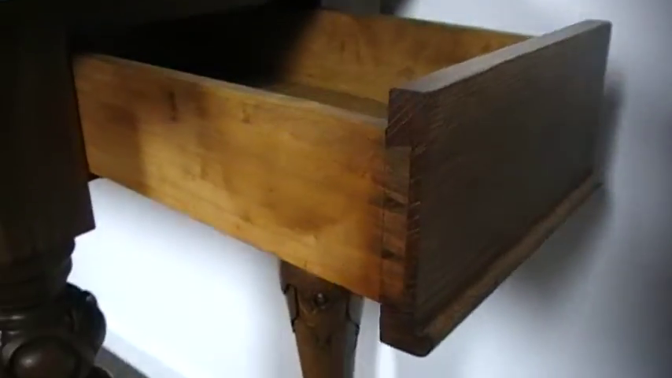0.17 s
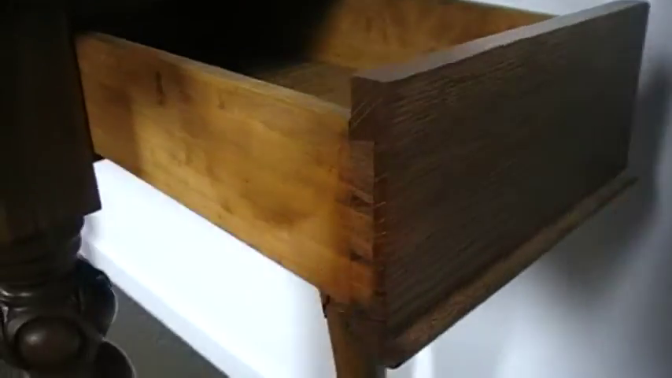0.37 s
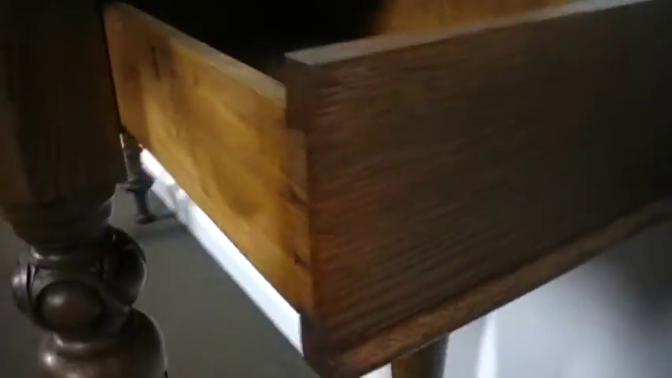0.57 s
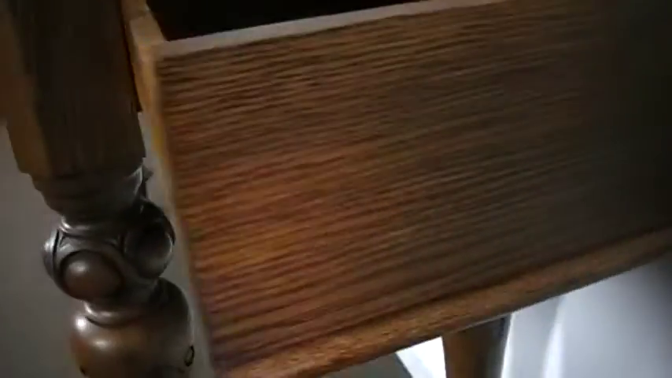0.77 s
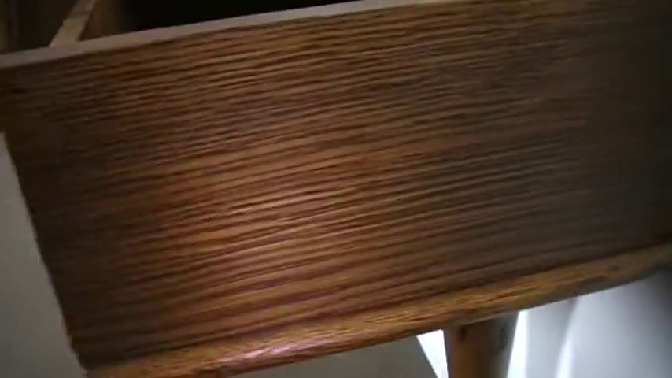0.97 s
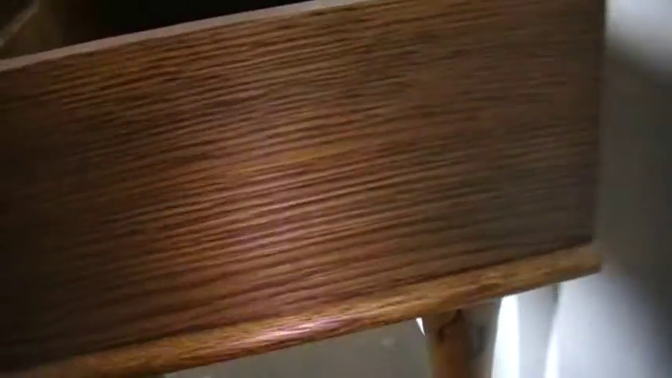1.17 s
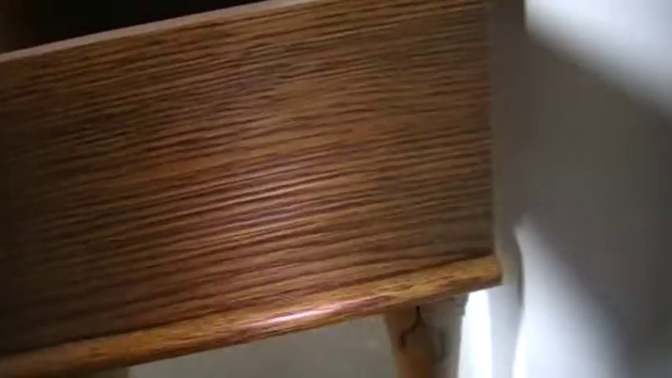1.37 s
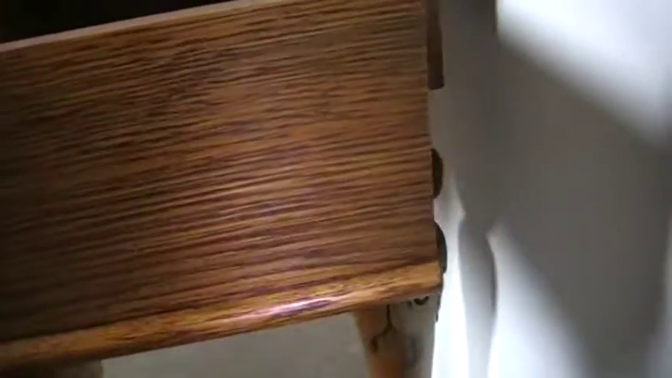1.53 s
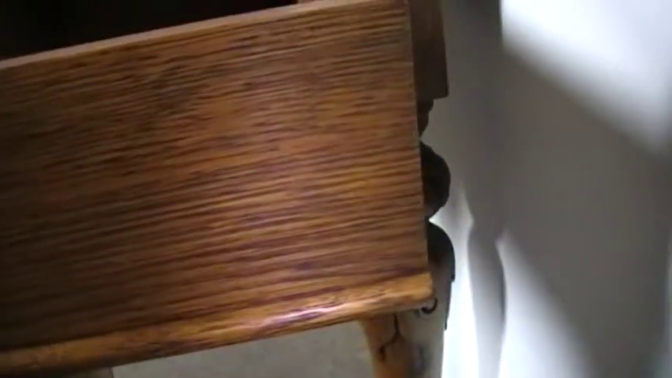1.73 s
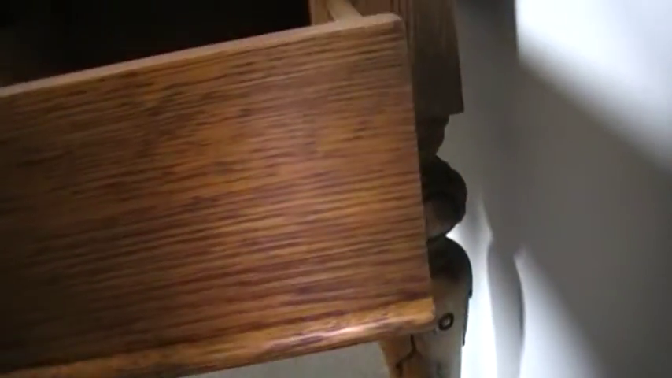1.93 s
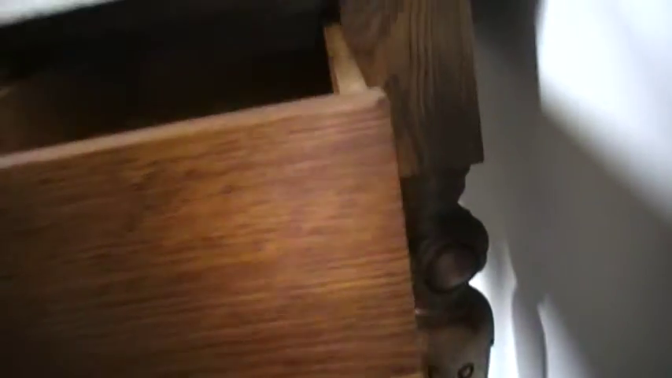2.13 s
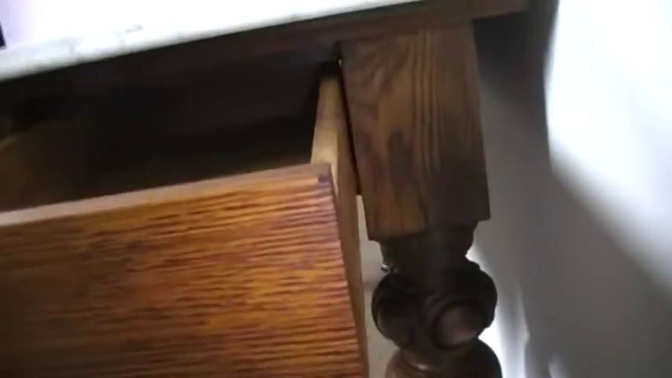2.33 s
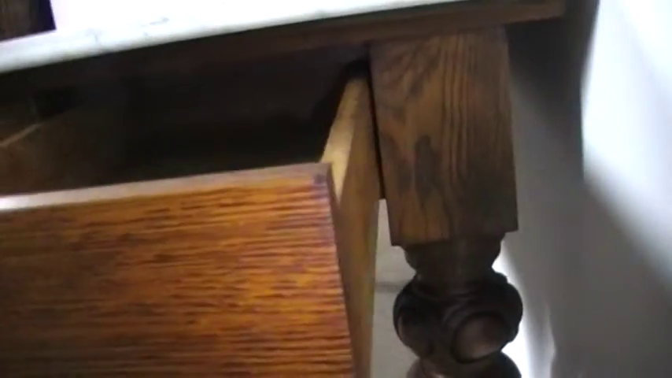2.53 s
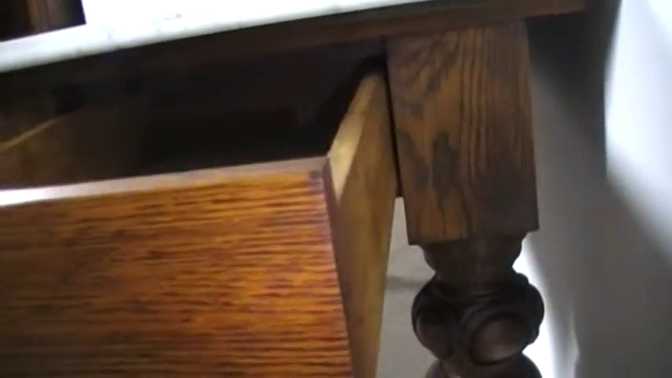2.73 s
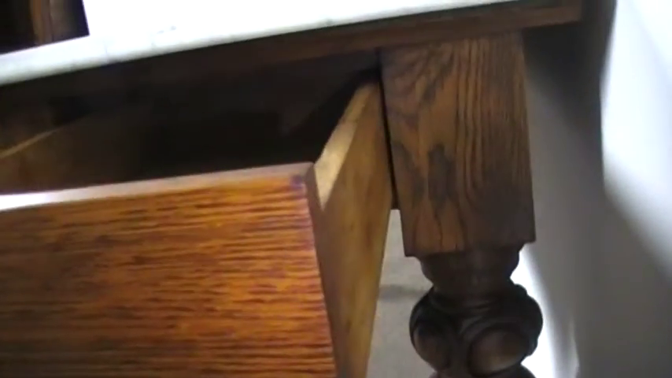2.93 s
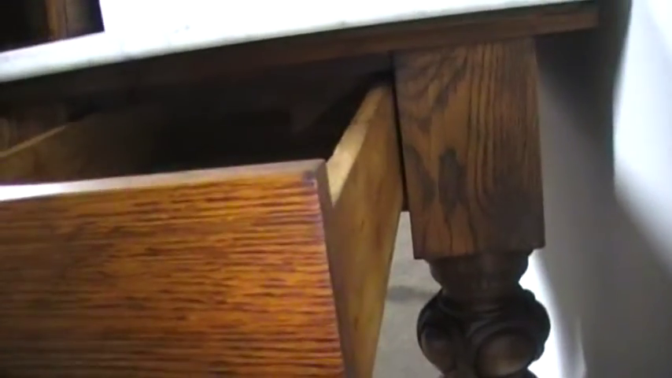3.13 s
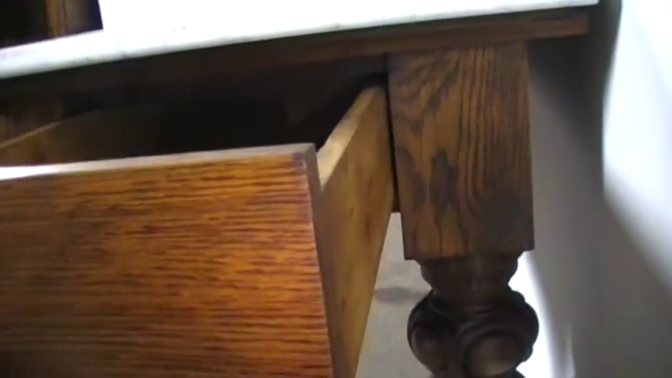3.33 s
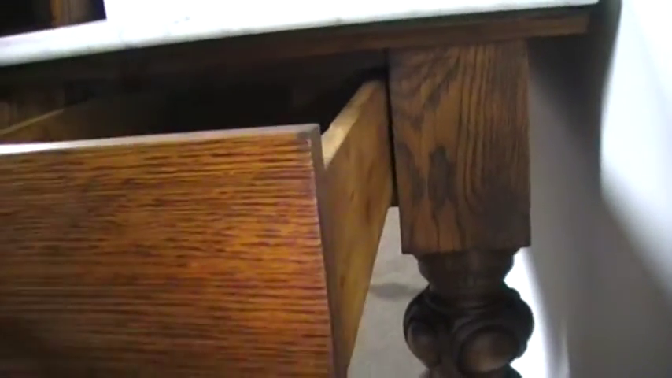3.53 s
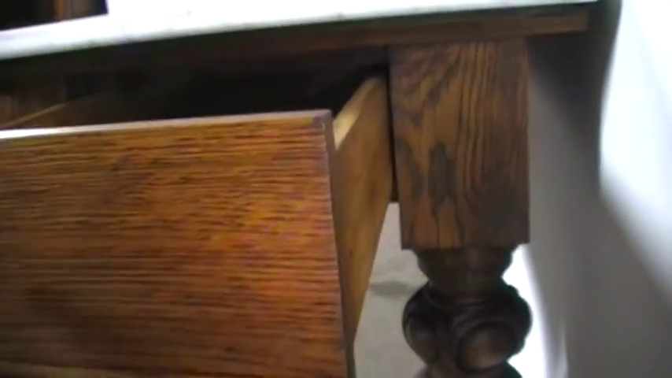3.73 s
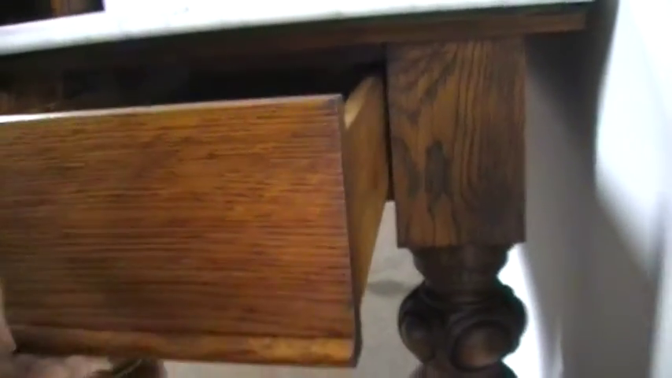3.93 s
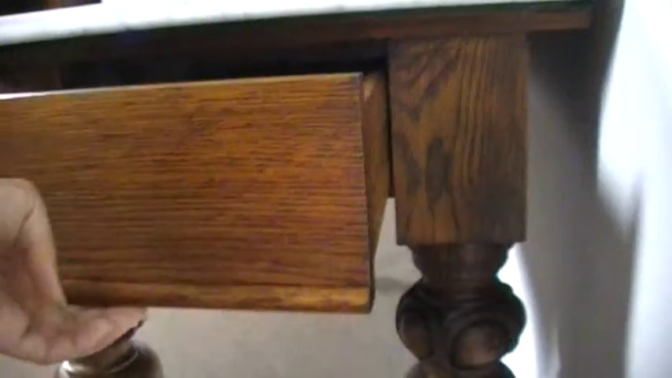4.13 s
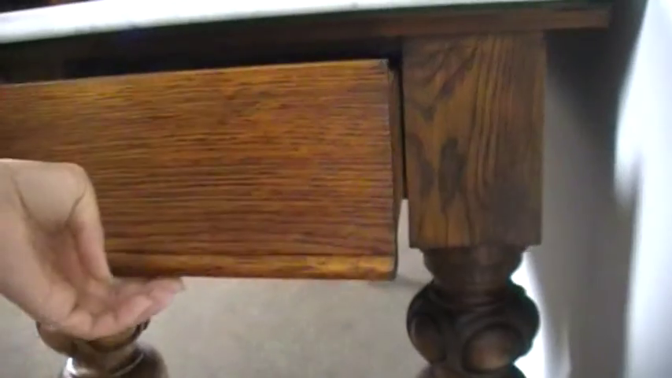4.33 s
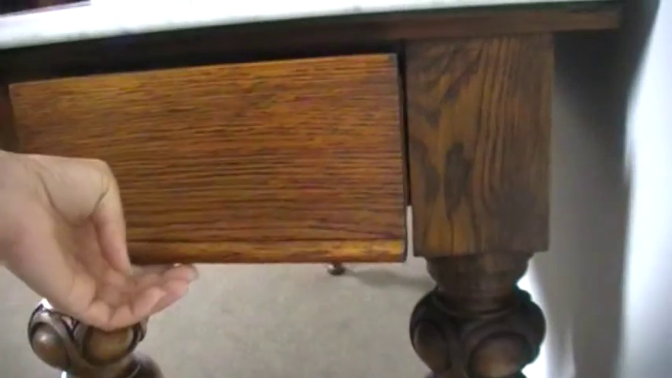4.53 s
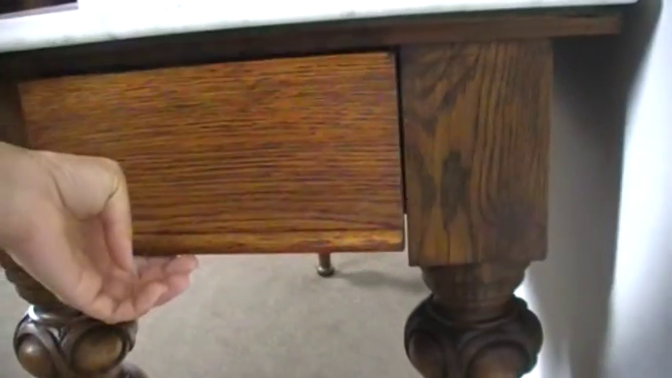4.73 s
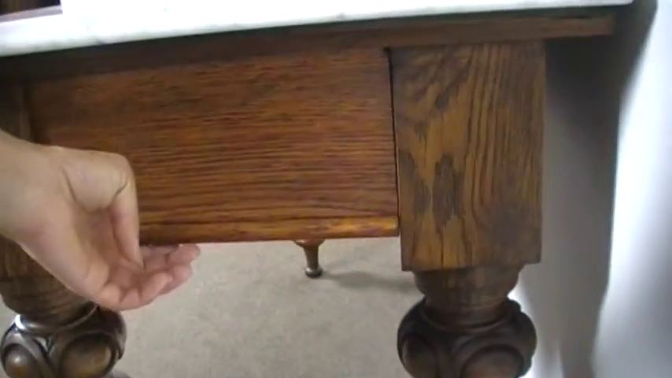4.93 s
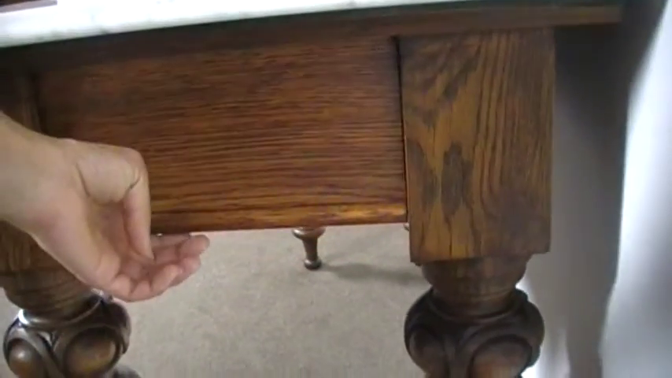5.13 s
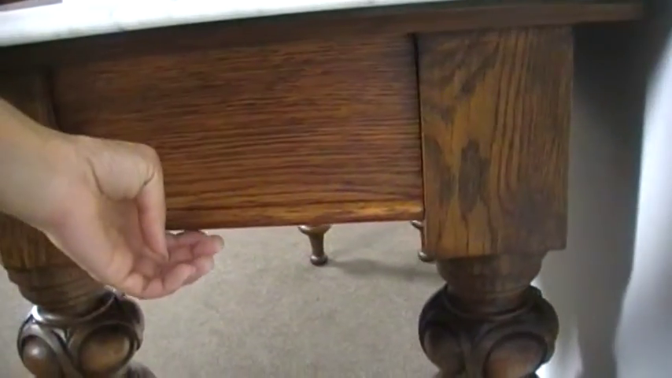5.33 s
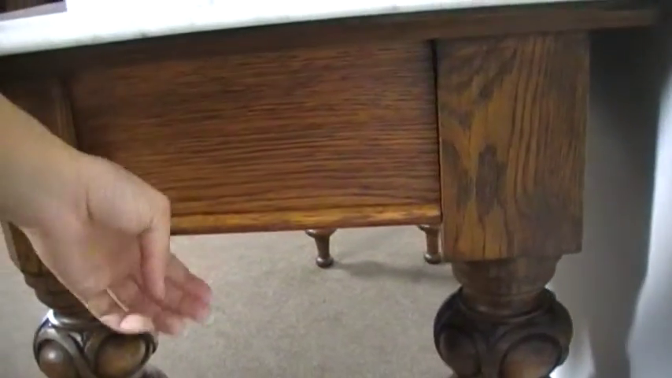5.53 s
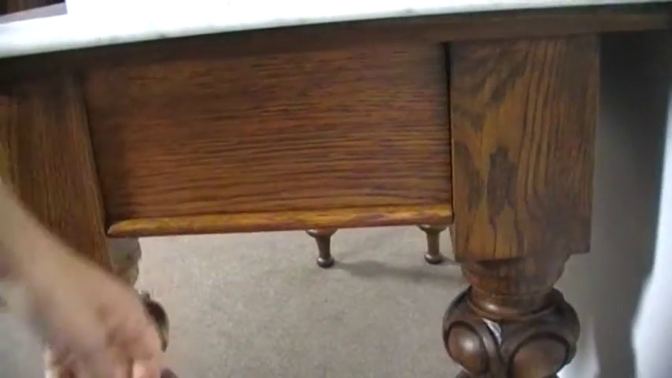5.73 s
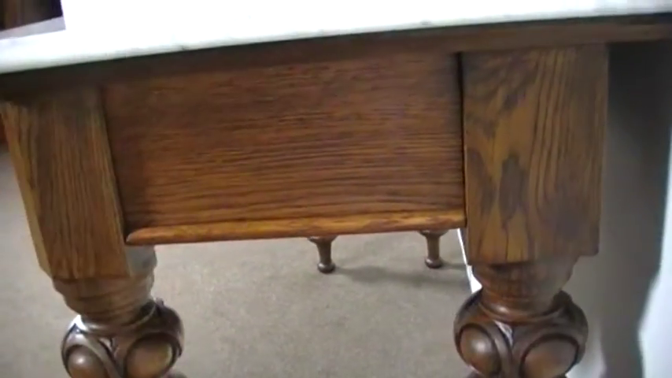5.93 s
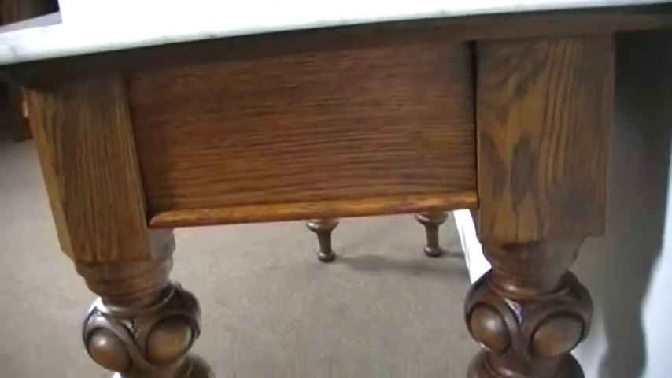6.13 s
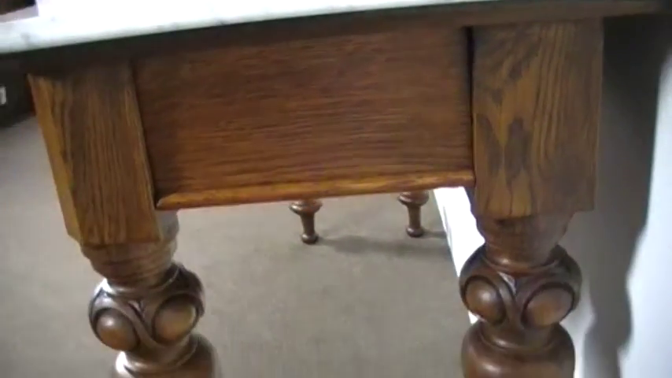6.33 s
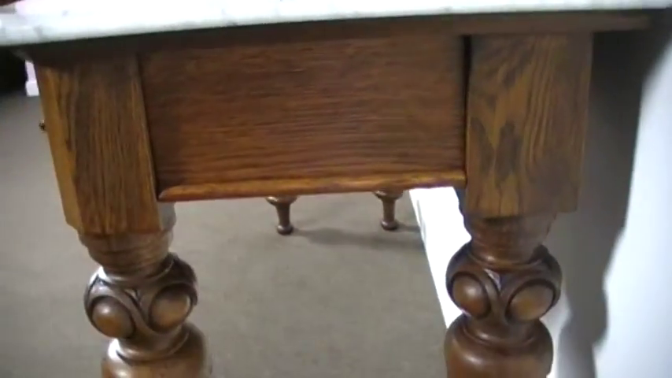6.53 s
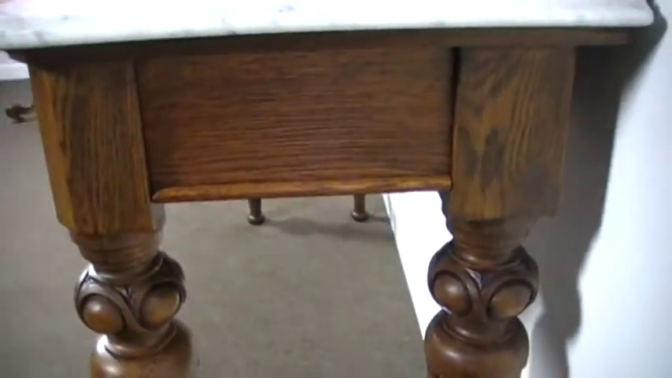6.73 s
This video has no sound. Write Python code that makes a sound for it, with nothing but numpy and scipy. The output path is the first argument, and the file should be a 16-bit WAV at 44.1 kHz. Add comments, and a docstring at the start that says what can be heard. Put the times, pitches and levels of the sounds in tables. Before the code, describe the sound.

Quiet indoor ventilation hum with faint motor tones. Clothing rustles and fingers tick against a hand-held stereo microphone. A loose oak drawer tips with a cluster of hollow wooden clunks, pauses, then is pushed in with a dry, hissing, drumming wood scrape. It stops with a sharp, loud crack, a very brief rattle and a moderate room tail; a last soft cloth scuff follows.

```python
"""A quiet showroom hums while clothes rustle and fingers tap on a hand-held microphone with two ports.
An old oak drawer, pulled far out of a table, then tips on its runners with wooden clunks.
Pushed home, it scrapes wood on wood, hits its stop with a sharp knock and rattles briefly.
Air noise and motor tones make the hum, and shaped noise bursts the small contacts; random catches drive
resonances for the scrape, and decaying wood modes sound in the blows, with a diffuse tail for the room."""
import sys
import numpy as np
from scipy import signal
from scipy.fft import rfft, irfft, next_fast_len
from scipy.io import wavfile
from scipy.ndimage import map_coordinates

SR = 44100
rng = np.random.default_rng(int(sys.argv[2]) if len(sys.argv) > 2 else 0)


def int16_out(signal):
    """Quantize to a 16-bit WAV file."""
    q = np.round(np.clip(np.atleast_2d(signal).T, -1, 1) * 32767)
    wavfile.write(sys.argv[1], SR, q.astype(np.int16))


N = 299429  # length in samples
T = np.arange(N) / SR  # time in seconds

CRACK_S = 4.9704  # moment of the final knock
# The push, from first movement to the stop. Each row: time in seconds, level of the friction in dB.
PUSH_FRICTION = [(3.165, -68), (3.22, -56.5), (3.294, -49), (3.344, -54), (3.584, -42.5), (3.708, -45),
                 (3.744, -39), (3.928, -36.5), (4.054, -38.5), (4.244, -37.5), (4.274, -40.5),
                 (4.298, -38.5), (4.558, -44), (4.945, -43.5)]
# Bright spectrum of wooden friction and splintering. Each row: frequency in Hz, gain in dB.
HISS_SPECTRUM = [(1500, -18), (3600, 0.5), (4600, -1.5), (5400, 0), (6500, -0.5), (7400, -0.5), (8900, -1),
                 (9400, -6), (10100, -5), (11200, -11), (11800, -13), (14000, -25.5), (15500, -53)]


def amp(db):
    """The decibel law: level in dB to amplitude gain."""
    return 10 ** (np.asarray(db) / 20)


def unit(x):
    """Normalization of power: scales to rms 1."""
    return x / np.sqrt(np.mean(x ** 2) + 1e-20)


def unit_energy(x):
    """Normalization of energy: scales a transient so that the squares average to a sum of 1 a channel."""
    return unit(x) / np.sqrt(x.shape[-1])


def read(points, hz):
    """Interpolation of a spectrum on a logarithmic frequency axis, as pitch is heard."""
    f, value = np.transpose(points)
    return np.interp(np.log(hz + 1), np.log(f + 1), value)


def add(mix, s, sound):
    """Superposition: adds a sound to the mix at time s in seconds."""
    part = mix[:, max(round(s * SR), 0):][:, :sound.shape[-1]]
    part += sound[..., :part.shape[1]]


def colour(x, points):
    """Linear filtering: multiplies the spectrum by a gain curve in dB."""
    size = next_fast_len(x.shape[-1] + 2048)
    gain = amp(read(points, np.fft.rfftfreq(size, 1 / SR)))
    return irfft(rfft(x, size) * gain, size)[..., :x.shape[-1]]


def pair(x, same):
    """Coherence: mixes two unrelated channels into a pair with the correlation same."""
    same = np.clip(same, 0, 1)
    mid = np.sqrt((1 + same) / 2) * x[0]
    side = np.sqrt((1 - same) / 2) * x[1]
    return np.array([mid + side, mid - side])


def diffuse(size, likeness):
    """Diffuse field: noise whose correlation between the two ports depends on frequency."""
    spectra = rfft(rng.standard_normal((2, size)))
    return irfft(pair(spectra, read(likeness, np.fft.rfftfreq(size, 1 / SR))), size)


def dying(noise, bands):
    """Frequency-dependent damping: splits noise into bands that each decay at their own speed."""
    size = noise.shape[-1]
    t, hz = np.arange(size) / SR, np.fft.rfftfreq(size, 1 / SR)
    spectrum = rfft(noise)
    centres, out = np.array(bands)[:, 0], 0
    for pick, (_, db, t60) in zip(np.eye(len(bands)), bands):
        weight = read(np.column_stack([centres, pick]), hz)
        band = irfft(spectrum * weight, size) * amp(-60 * t / t60)
        energy = t60 * np.sum(weight ** 2)  # long and wide bands carry more
        out = out + amp(db) * np.sqrt(energy) * unit_energy(band)
    return unit_energy(out)


def wander(per_s):
    """Random fluctuation: straight lines between normal random values, per_s of them a second."""
    return np.interp(T * per_s, np.arange(N), rng.standard_normal(N))


def asperities(per_s, spread_db, same):
    """Asperity contact: countless tiny catches of fibre on fibre, a few of them larger."""
    size = amp(spread_db * np.minimum(rng.exponential(1, (2, N)), 5))
    sign = rng.choice([-1, 1], (2, N))
    happens = rng.random((2, N)) < per_s / SR
    return pair(unit(size * sign * happens), same)


def resonate(x, hz, width):
    """Resonance: two equal poles, each width Hz wide, follow the frequency curve hz."""
    turn = np.exp(2j * np.pi * np.cumsum(hz * np.ones(N)) / SR)
    r = np.exp(-np.pi * width / SR)
    baseband = signal.lfilter([1], [1, -2 * r, r * r], x / turn)  # filtered around 0 Hz
    return unit((turn * baseband).real)


def stroke(peak_s, rise_s, fall_s, db):
    """Envelope of a rubbing movement: its gain changes by 20 dB in each of the rise and fall times."""
    away = np.maximum((peak_s - T) / rise_s, (T - peak_s) / fall_s)
    return amp(db - 20 * np.minimum(away, 10))


def ports(x, balance, lead):
    """Directional hearing: two microphone ports receive a source with different level and phase."""
    size = next_fast_len(N + 2048)
    hz, side = np.fft.rfftfreq(size, 1 / SR), np.array([[.5], [-.5]])
    transfer = amp(side * read(balance, hz)) * np.exp(1j * side * read(lead, hz))
    return irfft(rfft(x, size) * transfer, size)[:, :N]


def room_tail(build_s=0.0077):
    """Reverberation: the diffuse field builds up after a moment, then decays band by band."""
    # Decay of the room. Each row: frequency in Hz, level in dB, t60 in seconds.
    decay = [(100, -3.5, 0.54), (200, 3.5, 0.73), (438, 1, 0.66), (1000, 1, 0.71), (2000, 0.5, 0.89),
             (4030, 1, 0.62), (8000, -0.5, 0.51), (15160, -3.5, 0.076)]
    # Diffuse sound at the two ports. Each row: frequency in Hz, correlation from 0 to 1.
    likeness = [(60, 0.99), (300, 0.6), (700, 0.25), (1500, 0.5), (4000, 0.9), (12000, 0)]
    build_up = 1 - np.exp(-(np.arange(SR) / SR / build_s) ** 2)
    return dying(diffuse(SR, likeness), decay) * build_up


def showroom(x):
    """Convolution with a room response: returns the reverberation of a sound."""
    return signal.fftconvolve(x.mean(0)[None], room_tail(), axes=1)[:, :N]


def ventilation():
    """Broadband flow noise and tonal radiation: steady air with faint, slightly wavering motor tones."""
    # Air noise. Each row: frequency in Hz, gain in dB.
    air_spectrum = [(20, -31.5), (45, -27.5), (75, -12), (108, -6), (150, -6.5), (220, -4.5), (400, -5.5),
                    (750, -5.5), (1400, -9), (2500, -13.5), (4000, -16.5), (6300, -22.5), (10000, -24.5),
                    (15500, -36.5)]
    # Air at the two ports. Each row: frequency in Hz, left-right correlation from 0 to 1.
    likeness = [(60, 0.66), (150, 0.1), (220, 0), (15000, 0)]
    # Level difference of the ports. Each row: frequency in Hz, left minus right in dB.
    balance = [(60, -10), (110, -4.5), (200, -3.5), (380, -1.5), (700, -2.5), (1290, -1.5), (2380, -3),
               (4400, -1.5), (8120, -2), (15000, 0.0)]
    # Motor tones ahead of the port filter.
    # Each row: frequency in Hz, rms level in dB, extra lead of the left port in radians.
    tones = [(107.7, -83, .2), (726.7, -72, -.3), (1093, -79.5, -1.2), (2186.7, -72.5, -.5)]
    turns = np.cumsum(1 + 0.00048 * wander(per_s=7.6)) / SR  # all tones waver together
    hum = 0
    for hz, db, lead in tones:
        phase = 2 * np.pi * hz * turns + np.array([[lead], [0]])
        hum = hum + amp(db) * np.sqrt(2) * np.sin(phase)
    air = amp(-61.46) * unit(colour(diffuse(N, likeness), air_spectrum))
    return ports(air + hum, balance, lead=[(100, 0.55), (700, -1.51), (3000, -0.83)])


def rustle():
    """Granular friction: cloth and fingers brush near the microphone in clumps of small grains."""
    # Dull rub. Each row: frequency in Hz, gain in dB.
    rub_spectrum = [(300, -25), (700, 0), (1050, 2.5), (1250, -0.5), (1600, -1), (1900, -2), (2800, -12),
                    (5000, -27)]
    # Bright fizz. Each row: frequency in Hz, gain in dB.
    fizz_spectrum = [(1000, -1), (2800, 5.5), (5000, 2.5), (7000, 0), (9500, 0), (11500, -10.5),
                     (15500, -30)]
    # Each row: peak in seconds, rise in seconds, fall in seconds, level in dB, fizz against rub in dB.
    movements = [(.17, 0.88, 0.43, -59, 0), (0.193, 0.018, 0.013, -57.5, 4), (0.491, 0.017, 0.022, -64, 4),
                 (.52, 0.017, 0.036, -60.5, 0.5), (.62, 0.11, 0.24, -60.5, -3), (.91, 0.25, 1, -64, -2.5),
                 (6.52, 0.37, 0.26, -60.5, -0.5), (6.579, 0.04, 0.015, -69, 9)]
    rub = unit(colour(asperities(per_s=1200, spread_db=0.5, same=0.041), rub_spectrum))
    rub = rub * amp(2.4 * wander(per_s=29))
    fizz = unit(colour(asperities(per_s=3100, spread_db=0.5, same=0.36), fizz_spectrum))
    fizz = fizz * amp(2.0 * wander(per_s=120))
    return sum(stroke(*shape) * (rub + amp(fizz_db) * fizz) for *shape, fizz_db in movements)


def scuff(peak_s=6.582, drop_s=.028):
    """Moving resonance: a hollow cloth scuff swells, slides down in pitch just before its peak, then stops."""
    hz = np.interp(T, [peak_s - drop_s, peak_s], [1430, 1250])
    sound = resonate(asperities(per_s=770, spread_db=3.5, same=0.59), hz, width=360)
    return sound * stroke(peak_s, rise_s=.42, fall_s=.036, db=-52.5)


def clicks(rows, octaves, t60, gain_db):
    """Impulsive contact: a noise burst around one centre frequency dies at once."""
    t, out = np.arange(SR // 5) / SR, np.zeros((2, N))
    for s, db, hz in rows:
        burst = pair(rng.standard_normal((2, len(t))), same=0.45) * amp(-60 * t / t60)
        edges = [hz / 2 ** octaves, min(hz * 2 ** octaves, SR / 4.1)]
        band = signal.butter(3, edges, "bandpass", fs=SR, output="sos")
        sound = signal.sosfilt(band, burst)
        add(out, s, amp(db + gain_db) * sound / abs(sound).max())
    return out


def ticks_and_taps():
    """Contact bandwidth: dry ticks fill a wide high band, dull finger taps a narrow lower one."""
    # Small dry ticks. Each row: start in seconds, peak in dB ahead of gain_db, centre in Hz.
    ticks = [(.0372, -66.5, 4500), (.1206, -43.5, 4900), (.1228, -50, 4000), (.2555, -50, 7000),
             (.2972, -36, 5870), (.2982, -45.5, 2900), (.492, -45, 4200), (.629, -55, 4800),
             (1.922, -50.5, 5300), (2.019, -43.5, 4200), (2.048, -46.5, 4230), (2.14, -33, 5940),
             (2.187, -36.5, 5500), (2.2638, -40.5, 4000), (2.4473, -46.5, 4800), (2.591, -41, 7350),
             (2.5915, -49, 3200), (4.033, -31.5, 11100), (4.279, -29, 10500), (4.8916, -28, 5400),
             (5.0123, -28.5, 4730), (5.2643, -47.5, 5600), (5.4535, -46, 4870), (6.569, -48, 5500),
             (6.579, -42, 4500), (6.59, -49, 5300), (6.6005, -47, 4000), (6.7436, -47, 4200)]
    # Dull light taps. Each row: start in seconds, peak in dB ahead of gain_db, centre in Hz.
    taps = [(.19, -44, 1430), (.212, -52, 1100), (.41, -46, 1300), (.535, -41, 1590), (.6645, -46, 1900),
            (.666, -47, 895), (.891, -49, 1300), (.911, -43.5, 1380), (6.542, -42, 1910),
            (6.579, -40, 1260)]
    dry_ticks = clicks(ticks, octaves=0.9, t60=0.012, gain_db=1.5)
    return dry_ticks + clicks(taps, octaves=0.38, t60=0.016, gain_db=-1.5)


def blows(rows, modes, lowest_hz):
    """Modal excitation: each blow rings the modes of the wood; a soft contact leaves out the high ones."""
    # The dense short modes of the boards. Each row: frequency in Hz, level in dB, t60 in seconds.
    grain = [(90.3, -16.5, 0.12), (200, -1, 0.089), (497, -2, 0.17), (1101, 5, 0.056), (1720, 0, 0.08),
             (2590, 1.5, 0.05), (4020, -12, 0.043), (7980, -12.5, 0.036), (11000, -15.5, .02),
             (14000, -29, .02)]
    t, out = np.arange(SR // 2) / SR, np.zeros((2, N))
    ring = 0
    for k, (hz, db, t60) in enumerate(modes):
        ring = ring + (-1) ** k * amp(db - 60 * t / t60) * np.sin(2 * np.pi * hz * t)
    ring = unit_energy(ring)
    radiation = signal.butter(4, lowest_hz, "highpass", fs=SR, output="sos")  # small boards radiate little bass
    for s, db, hard_hz, dense_db in rows:
        boards = dying(pair(rng.standard_normal((2, len(t))), same=0.89), grain)
        contact = signal.butter(1, min(hard_hz, SR / 3), fs=SR, output="sos")
        sound = signal.sosfilt(np.vstack([contact, contact, radiation]), ring + amp(dense_db) * boards)
        add(out, s, amp(db) * unit_energy(sound) * np.sqrt(SR / 100))  # level as the rms over 10 ms
    return out


def tipping():
    """Place-dependent excitation: after a small tock, each clunk favours other modes of the drawer."""
    # A light first touch on one runner. Each row: start in seconds, level in dB,
    # contact hardness in Hz, dense modes against the ring in dB.
    tock = [(2.0468, -45.5, 2500, -0.5)]
    # Modes of that runner. Each row: frequency in Hz, level in dB, t60 in seconds.
    runner = [(500, -17, 0.23), (986, 3, 0.056), (1281, -16, .05)]
    # The overhanging drawer tips and settles on its runners. Each row: start in seconds, level in dB,
    # contact hardness in Hz, dense modes against the ring in dB, frequency of the favoured modes in Hz.
    clunks = [(2.1404, -32.5, 3200, 19, 2400), (2.1444, -23, 450, -3.5, 483), (2.153, -35, 400, -9, 483),
              (2.1649, -47, 4000, 14, 2400), (2.178, -52, 4000, 10, 3000), (2.1845, -26, 800, 4, 650),
              (2.1864, -26.5, 3500, -3.5, 805), (2.1936, -29.5, 1100, -4, 1240),
              (2.2222, -36.5, 302, -10, 250), (2.2301, -34.5, 2500, -2, 1450), (2.233, -38, 4500, 5, 1500),
              (2.2372, -37, 1800, -7, 680), (3.313, -46.5, 400, -10, 480)]
    # Modes of the overhanging drawer. Each row: frequency in Hz, level in dB, t60 in seconds.
    drawer = [(229, -7.5, 0.078), (278, -5, 0.082), (327, -3.5, 0.056), (394, -4.5, 0.11),
              (486.3, 2.5, 0.14), (673, -2, 0.095), (760, -3.5, 0.051), (830, 3.5, 0.056),
              (922, 1.5, 0.073), (1230, 2.5, 0.051), (1337, 3.5, 0.046), (1397, -1, 0.044),
              (1518, 2, 0.065), (1960, -3, 0.04), (2480, 0, 0.034), (2830, -9, 0.03), (3070, -6, 0.047),
              (3470, -3, .03)]
    out = blows(tock, runner, lowest_hz=300)
    for *blow, favoured_hz in clunks:
        modes = []
        for hz, db, t60 in drawer:
            octaves = np.log2(hz / favoured_hz)
            modes.append((hz, db + 5.5 * np.exp(-(octaves / 0.22) ** 2), t60))
        out = out + blows([blow], modes, lowest_hz=208)
    return out


def seated(seated_s=4.275, seating_s=0.079):
    """Change of support: 0 while the drawer overhangs, 1 once it is past balance and sits on the case."""
    return np.clip((T - seated_s) / seating_s + 1, 0, 1)


def friction():
    """Power laws of friction: rasp, drumming and hiss each follow one friction level with their own slope."""
    # The loose drawer shifts a little on its runners.
    # Each row: peak in seconds, rise in seconds, fall in seconds, friction in dB.
    shifts = [(2.17, 0.081, 0.051, -50), (2.31, 0.26, 0.048, -59), (2.8, 0.15, 0.26, -66)]
    s, db = np.transpose(PUSH_FRICTION)
    push = amp(np.interp(T, s, db)) * (T > s[0]) * (T < CRACK_S)
    usual_db = -42
    over_db = 20 * np.log10(push + sum(stroke(*row) for row in shifts)) - usual_db
    rasp_db = -42 + 1.04 * over_db
    drum_db = -46 + 0.77 * over_db
    hiss_db = -46.5 + 0.8 * over_db - 0.84 * seated()  # hiss drops once the drawer is seated
    return amp(rasp_db), amp(drum_db), amp(hiss_db)


def slips(per_s, release_s, depth):
    """Stick and slip: the drive jumps at uneven moments, each time by its own amount, and sinks back."""
    jumps = rng.uniform(.3, 1, N) * (rng.random(N) < per_s / SR)
    release = np.exp(-1 / (release_s * SR))
    return unit(1 + depth * signal.lfilter([1], [1, -release], jumps))


def shifting(x, patch_hz, patch_s, depth_db):
    """Moving excitation: the contact favours now these, now those of the many modes of the boards."""
    hz, t, spectrum = signal.stft(x, SR, nperseg=1024, noverlap=768)
    places = np.meshgrid(hz / patch_hz, t / patch_s, indexing="ij")
    favour = map_coordinates(rng.standard_normal((256, 256)), places, order=1, mode="wrap")
    _, sound = signal.istft(spectrum * amp(depth_db * favour), nperseg=1024, noverlap=768)
    return unit(sound[..., :N])


def rasping(jerks, shut):
    """Friction-driven resonance: catches rasp and ring the thin sides, damped as they enter the case."""
    # Rasp. Each row: frequency in Hz, gain in dB.
    rasp_spectrum = [(150, -36.5), (500, -1.5), (750, -1.5), (1100, -2.5), (1420, -8), (1900, -1.5),
                     (2300, -9), (2800, -7), (3500, -15.5), (5000, -17.5), (9000, -46.5)]
    # Resonances of the sides. Each row: frequency in Hz, pole width in Hz, level open in dB, shut in dB.
    side_modes = [(778, 100, -4.5, -6), (1000, 70, 3, -4), (1238, 50, -13.5, 0), (1498, 28, -5.5, -22.5),
                  (1787, 60, 1.5, -8), (1950, 47, 0, -7), (2124, 36, -7.5, -7.5), (2361, 73, -3.5, -11.5),
                  (2740, 150, -0.5, -11.5), (3290, 110, -6, -15.5), (3616, 190, -13.5, -6.5)]
    catches = jerks * asperities(per_s=1500, spread_db=2, same=0.88)
    sides = 0
    for hz, width, open_db, shut_db in side_modes:
        # the moving contact favours now one resonance, now another
        gain = amp(open_db + (shut_db - open_db) * shut + 1.2 * wander(per_s=12))
        sides = sides + gain * resonate(catches, hz * (1 + 0.005 * wander(per_s=5)), width)
    rasp = colour(asperities(per_s=2000, spread_db=2.4, same=.9), rasp_spectrum)
    rasp = shifting(rasp, patch_hz=110, patch_s=.045, depth_db=3.4)
    return amp(-1.8) * rasp * jerks + amp(-2.5) * unit(sides)


def drumming(shut):
    """Panel resonance: large panels drum under the friction and swell when a catch makes one shudder."""
    # Panel resonances change as the case takes up the drawer. Each row: frequency open in Hz, shut in Hz,
    # pole width in Hz, level overhanging in dB, seated in dB.
    panels = [(229.7, 208, 16, -19, -4.5), (261, 280, 35, -7, -10.5), (332, 301.5, 40.5, -7.5, 2),
              (497, 488, 40, -5.5, -1), (597, 569, 63, -9, -2.5), (717, 586, 80, -5.5, -3)]
    # The drawer catches on its runners and one panel shudders.
    # Each row: centre in seconds, extra drumming in dB, frequency of that panel in Hz.
    catches = [(3.32, 4.5, 495), (3.84, 6, 490), (4.02, 9, 320), (4.19, 9, 320), (4.33, 9.5, 215),
               (4.40, 3.5, 310), (4.5, 8, 310), (4.52, 4.5, 495), (4.7, 8.5, 300), (4.78, 6, 215),
               (4.91, 2.5, 495)]
    shake = asperities(per_s=900, spread_db=2.5, same=0.99)[0]
    sitting, out = seated(), 0
    shudders = [(db * np.exp(-np.minimum(abs(T - s) / 0.036, 5) ** 2), hz) for s, db, hz in catches]
    for open_hz, shut_hz, width, open_db, seated_db in panels:
        hz = (open_hz + (shut_hz - open_hz) * shut) * (1 + 0.036 * wander(per_s=9))
        shudder_db = 0
        for db, at_hz in shudders:  # a shudder spreads to panels of nearby pitch
            shudder_db = shudder_db + db * np.exp(-(np.log2(at_hz / shut_hz) / 0.23) ** 2)
        level_db = open_db + (seated_db - open_db) * sitting + shudder_db + 1.2 * wander(per_s=19)
        out = out + amp(level_db) * resonate(shake, hz, width)
    return out


def runner_echo(x, delay_s, share):
    """Reflection at a boundary: vibration returns from the runner's end; delay drifts with the contact."""
    return x + share * np.array([np.interp(T - delay_s, T, channel) for channel in x])


def hissing(shut):
    """Comb filtering: bright friction noise at the runners meets its own reflection."""
    hiss = colour(asperities(per_s=9000, spread_db=2.2, same=.72), HISS_SPECTRUM)
    hiss = runner_echo(hiss, delay_s=.0011 + .0002 * shut, share=.25)
    return shifting(hiss, patch_hz=190, patch_s=.12, depth_db=2.4)


def scrape():
    """Sliding friction: runners hiss, sides rasp and panels drum until the drawer stops."""
    rasp_gain, drum_gain, hiss_gain = friction()
    shut = np.interp(T, [PUSH_FRICTION[0][0], CRACK_S], [0, 1])  # share of the travel done
    jerks = slips(per_s=100, release_s=.003, depth=1.3)
    sound = drumming(shut) * drum_gain + rasping(jerks, shut) * rasp_gain
    sound = sound + hissing(shut) * hiss_gain * jerks ** 0.32
    sound = sound * amp(0.7 * wander(per_s=45))  # uneven grip
    return signal.sosfilt(signal.butter(2, 130, "highpass", fs=SR, output="sos"), sound)


def floor_thumps():
    """Structure-borne sound: the weight of the drawer thumps through the legs into the floor."""
    # Each row: start in seconds, peak in dB ahead of gain_db, centre in Hz.
    thumps = [(2.19, -55, 100), (2.224, -43, 102), (3.635, -54, 115), (4.97, -50, 79.4), (4.995, -49, 90)]
    return clicks(thumps, octaves=0.5, t60=0.112, gain_db=-2.5)


def rattle(count):
    """Inelastic bouncing: the drawer rattles against its stop, each bounce sooner and weaker."""
    k = np.arange(count)
    gaps = .009 * .95 ** k  # seconds
    starts = 4.988 + np.cumsum(gaps) - gaps
    levels = -23 - 1.9 * k
    return [(s, db, 850, 1) for s, db in zip(starts, levels)]  # hardness in Hz, dense modes in dB


def stop_knocks():
    """Coupled modes: bumps, stop and rattle ring case and drawer together; the front rings by itself."""
    # The drawer bumps along the case and hits the stop. Each row: start in seconds, level in dB,
    # contact hardness in Hz, dense modes against the ring in dB.
    bumps = [(3.632, -49, 89.5, 7), (4.278, -34.5, 128.3, -0.5), (4.294, -35, 120.5, 0.5),
             (4.9691, -20, 700, -7), (4.9768, -22, 2596, 0), (4.9832, -26, 2610, 0)]
    # Modes of the case with the drawer in it. Each row: frequency in Hz, level in dB, t60 in seconds.
    case = [(172, -7, .2), (210, -5, .17), (238, -2, .16), (286, 0, .18), (334, -2, .13), (381, -4, .16),
            (467, 1, .16), (550, 2, .16), (629, 1, .13), (716, -3, .17), (829, -5, .15), (888, -5, .2),
            (958, 0, .14), (987, 0, .16), (1080, -1, .15), (1150, 2, .14), (1217, -2, .16), (1248, 3, .14),
            (1405, 1, .18), (1485, -1, .14), (1601, 2, .13), (1696, 2, .13), (1740, 4, .12), (1945, 1, .12),
            (2067, -1, .11), (2680, 2, .08)]
    # The face of the drawer meets the frame a moment before the crack. Each row: start in seconds,
    # level in dB, contact hardness in Hz, dense modes against the ring in dB.
    face_blow = [(4.969, -18, 6000, -16)]
    # Modes of the drawer face. Each row: frequency in Hz, level in dB, t60 in seconds.
    face = [(1044, 1, 0.038), (1650, -2.5, 0.041), (2690, -6, 0.017), (3770, -5, .03), (6210, -10.5, .022),
            (9180, -11, .02)]
    knocks = blows(bumps + rattle(count=5), case, lowest_hz=146)
    return knocks + blows(face_blow, face, lowest_hz=299)


def crack(slap_db=-17.5, splinter_db=-29, splinter_t60=0.054, echo_db=-22, swell_s=0.088):
    """Impact radiation: oak meets oak in a slap, bright splintering, a table boom and the room's echo."""
    # The slap of the two flat faces. Each row: frequency in Hz, level in dB, t60 in seconds.
    slap_bands = [(201, -9, .012), (707, -4, .012), (1066, 6.5, 0.0135), (1680, 4, 0.011),
                  (2120, 0.5, .008), (3130, -1, 0.0098), (3870, 2, 0.011), (4730, -12.5, .016),
                  (6100, -8, 0.02), (9090, -9, 0.0095), (11100, -4.5, .008), (12000, -26.5, .008),
                  (15900, -43.5, .007)]
    # What the room returns of the knock. Each row: frequency in Hz, gain in dB.
    echo_spectrum = [(60, -30), (120, -6), (160, 7.5), (260, 7.5), (420, 0), (700, 1.5), (1100, 4.5),
                     (1700, -4.5), (2300, -10.5), (3500, -12), (5000, -16.5), (9000, -21.5), (14000, -34)]
    # Slow modes of the whole table. Each row: frequency in Hz, level in dB, t60 in seconds.
    table_modes = [(138, -26.5, 0.35), (166.4, -28, 0.47), (176, -24.5, 0.44), (217, -31.5, 0.53),
                   (237, -31, 0.46), (286, -28.5, 0.45)]
    t, out = np.arange(SR) / SR, np.zeros((2, N))
    slap_likeness = [(700, 0.47), (4000, 0.61), (6000, 0.91), (8500, 0.14), (12000, .6)]
    slap = dying(diffuse(4096, slap_likeness), slap_bands)
    splinter = colour(diffuse(SR, [(1000, 0.93), (12000, 0.76)]), HISS_SPECTRUM)
    splinter = unit_energy(splinter * amp(-60 * t / splinter_t60))
    echo = unit_energy(colour(room_tail(), echo_spectrum))
    for db, sound in ((slap_db, slap), (splinter_db, splinter), (echo_db, echo)):
        add(out, CRACK_S, amp(db) * sound * np.sqrt(SR / 100))  # level as the rms over 10 ms
    boom = sum(amp(db - 60 * t / t60) * np.sin(2 * np.pi * hz * t) for hz, db, t60 in table_modes)
    add(out, CRACK_S, boom * (1 - np.exp(-t / swell_s)))  # the heavy table takes a moment to swing up
    return signal.sosfilt(signal.butter(3, 115, "highpass", fs=SR, output="sos"), out)


def scene():
    """Superposition of sources: the drawer, the room's answer and the small sounds around it."""
    # Level of the drawer at the ports. Each row: frequency in Hz, left minus right in dB.
    near_side = [(100, -4), (400, -6.5), (700, -5), (1300, -1.5), (2400, -2.5), (4400, -2), (8000, -1.1),
                 (15000, 2)]
    # Phase of the drawer at the ports. Each row: frequency in Hz, lead of the left port in radians.
    phase_lead = [(100, 0.061), (400, 0.061), (860, .4), (2000, 0), (6000, 0.049), (8000, 0.38),
                  (12000, 0.067)]
    small = ticks_and_taps()
    clunks, slide, knocks = tipping(), scrape(), stop_knocks()
    reverberation = showroom(amp(-12.0) * slide + amp(-17.5) * clunks + amp(-25.0) * knocks)
    wood = slide + clunks + knocks + crack() + reverberation
    drawer_sound = ports(wood + floor_thumps(), near_side, phase_lead)
    small = small + amp(-15) * showroom(small)
    return drawer_sound + small + rustle() + scuff() + ventilation()


def record(dry):
    """Saturation and band limiting: peaks clip at full scale, then a low-pass cuts at 16 kHz."""
    low_pass = signal.firwin(255, 16000, window=("kaiser", 8), fs=SR)
    return signal.oaconvolve(np.clip(dry, -1, 1), low_pass[None], "same")


dry = scene()
out = record(dry)
int16_out(out)
```